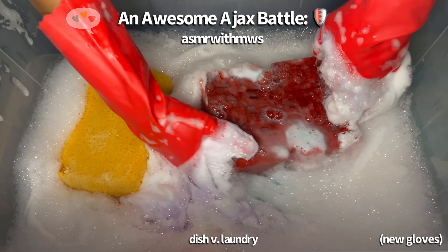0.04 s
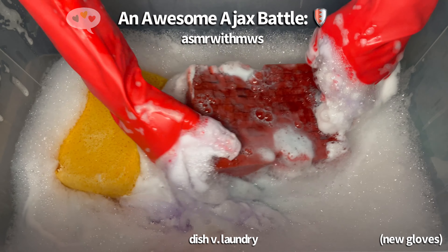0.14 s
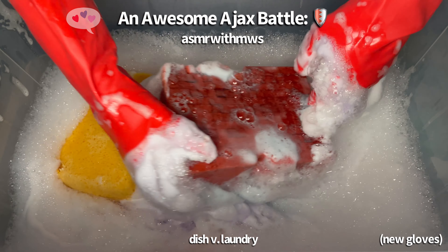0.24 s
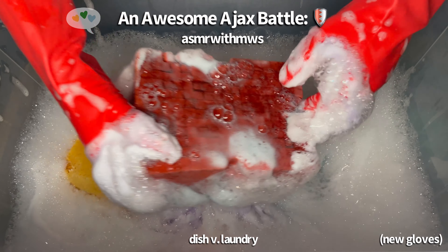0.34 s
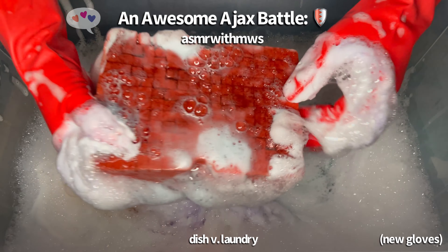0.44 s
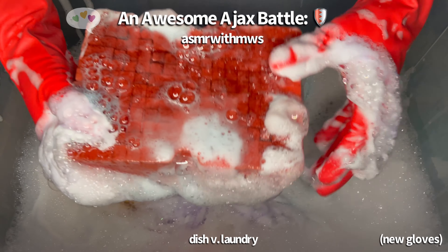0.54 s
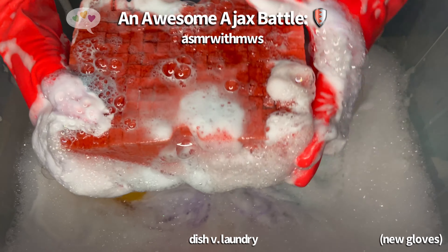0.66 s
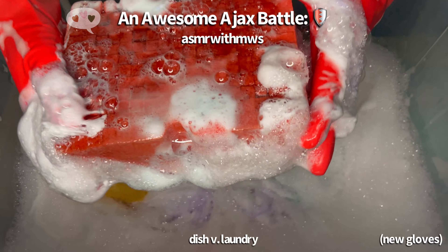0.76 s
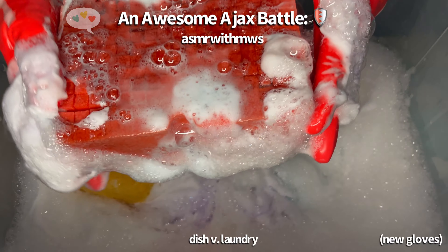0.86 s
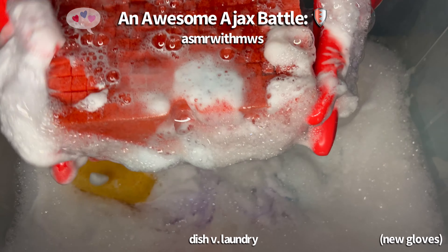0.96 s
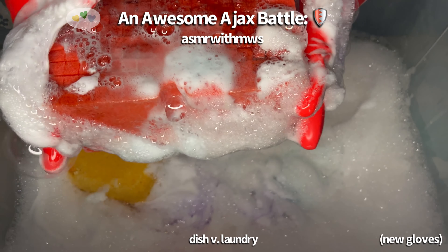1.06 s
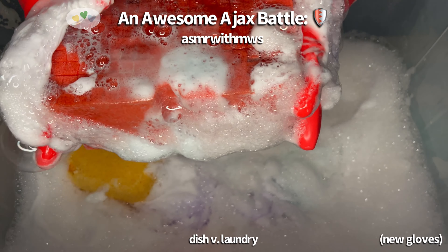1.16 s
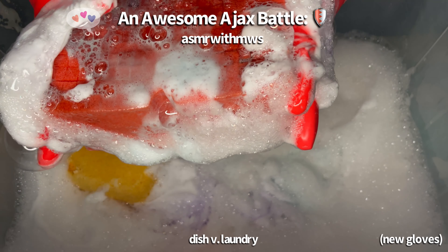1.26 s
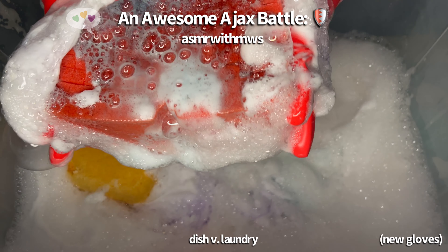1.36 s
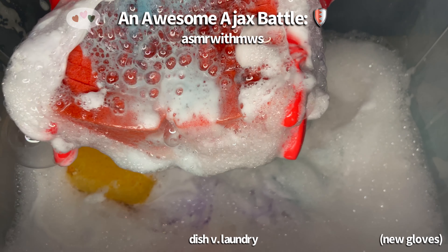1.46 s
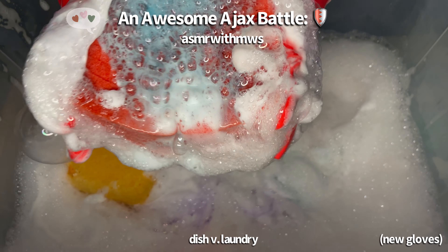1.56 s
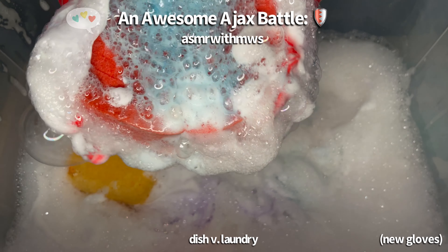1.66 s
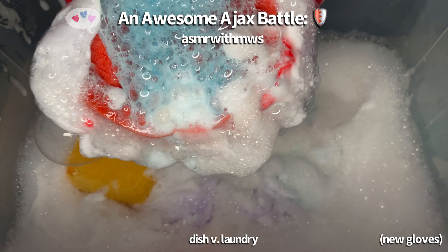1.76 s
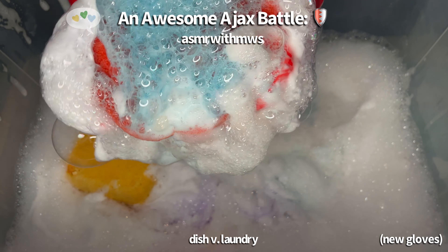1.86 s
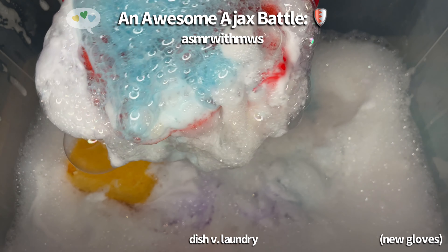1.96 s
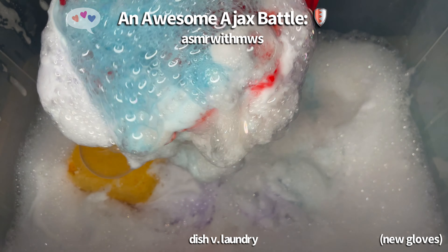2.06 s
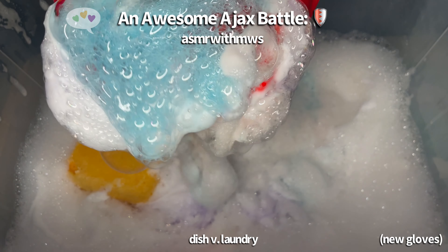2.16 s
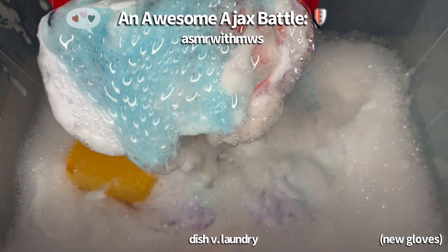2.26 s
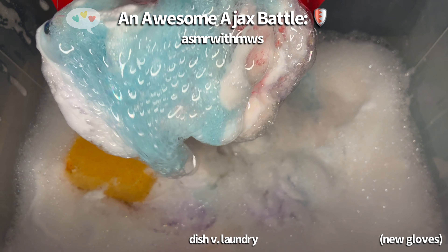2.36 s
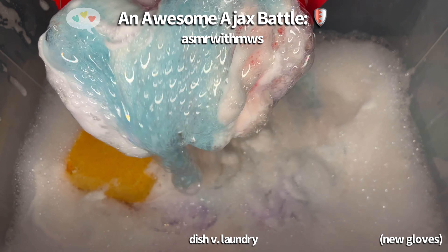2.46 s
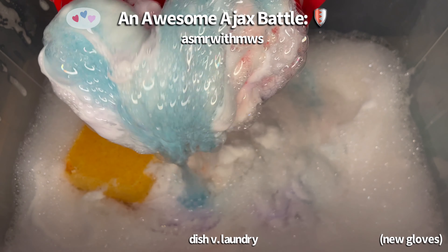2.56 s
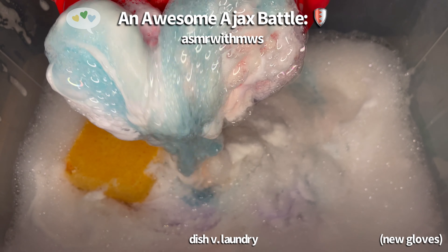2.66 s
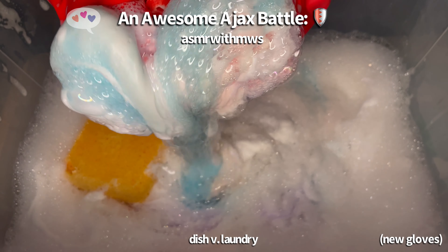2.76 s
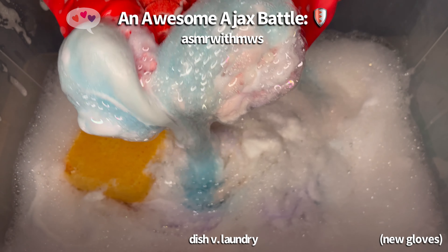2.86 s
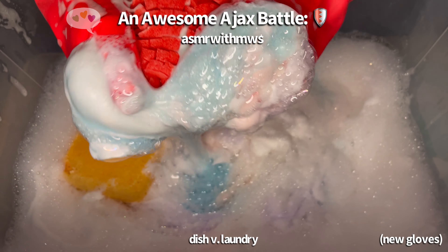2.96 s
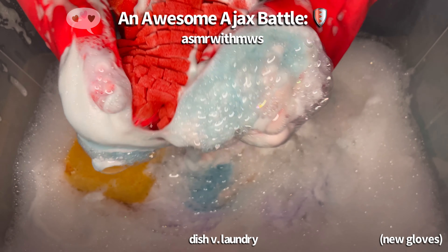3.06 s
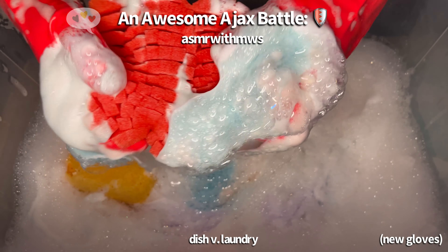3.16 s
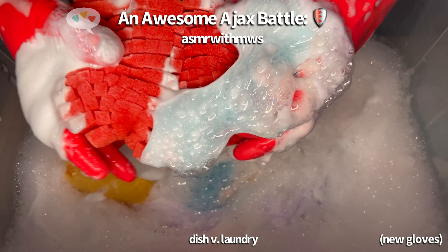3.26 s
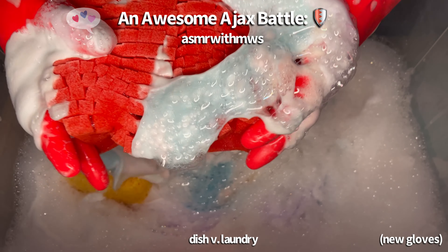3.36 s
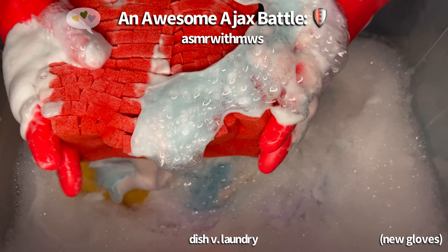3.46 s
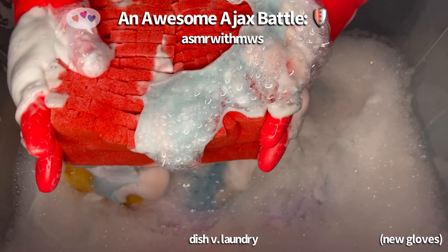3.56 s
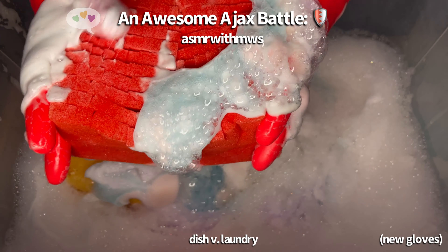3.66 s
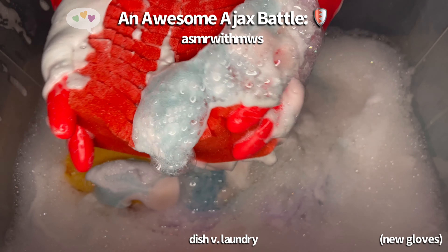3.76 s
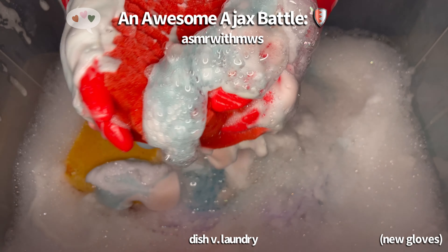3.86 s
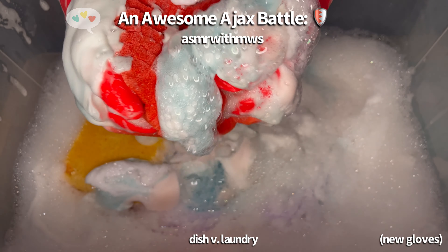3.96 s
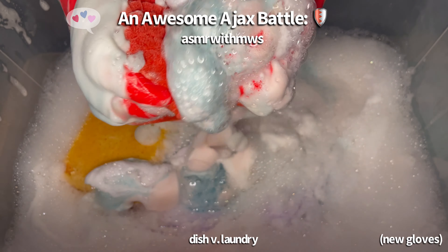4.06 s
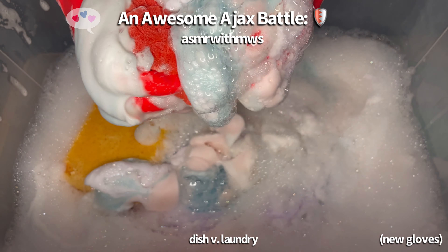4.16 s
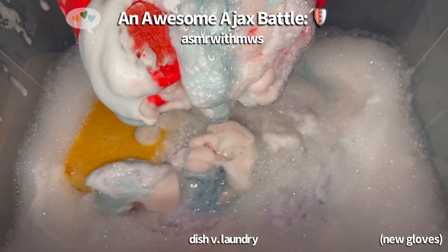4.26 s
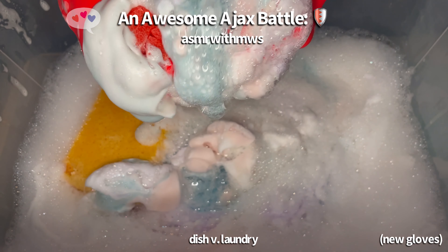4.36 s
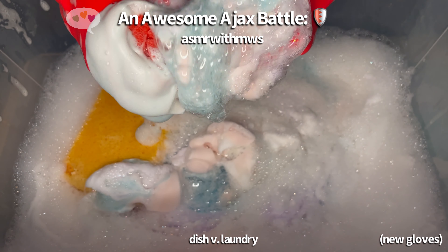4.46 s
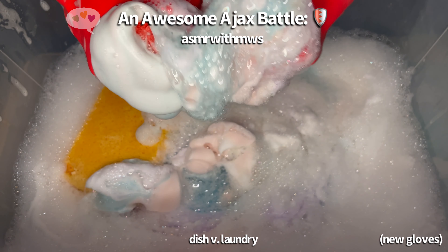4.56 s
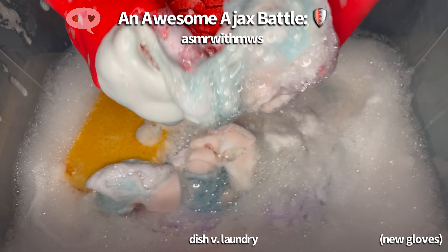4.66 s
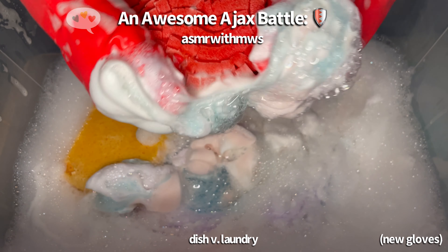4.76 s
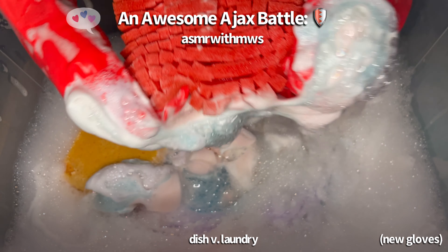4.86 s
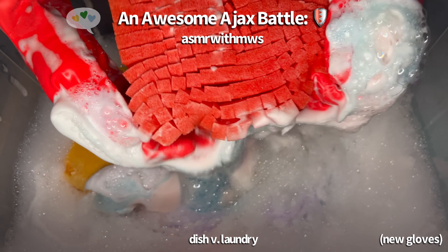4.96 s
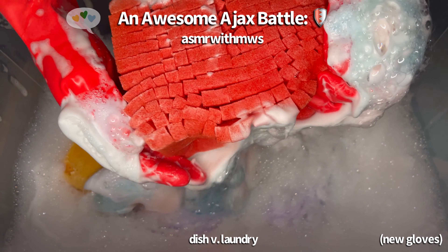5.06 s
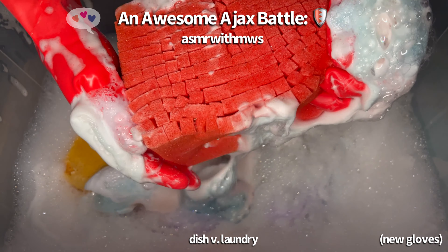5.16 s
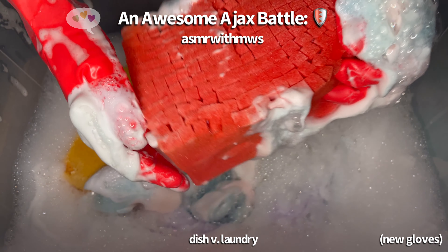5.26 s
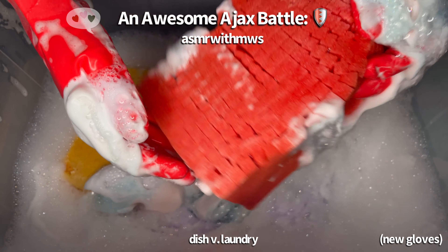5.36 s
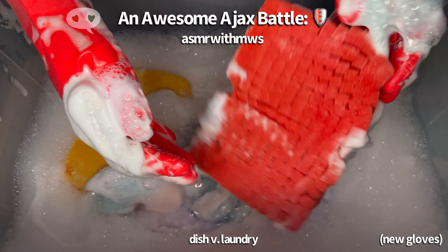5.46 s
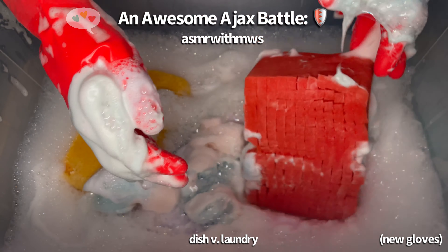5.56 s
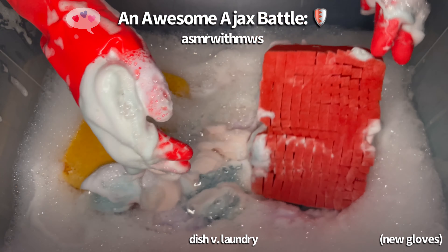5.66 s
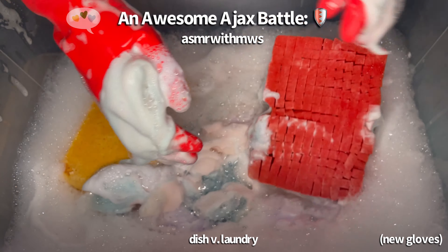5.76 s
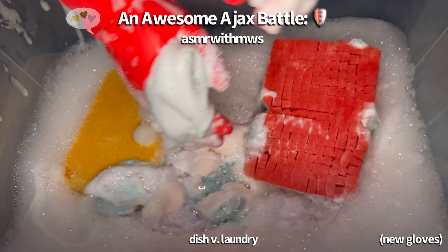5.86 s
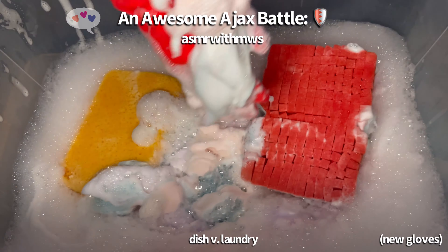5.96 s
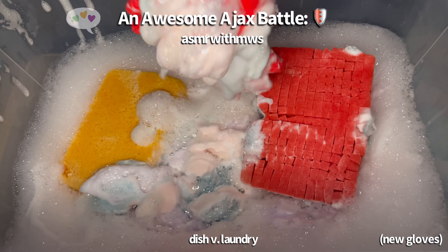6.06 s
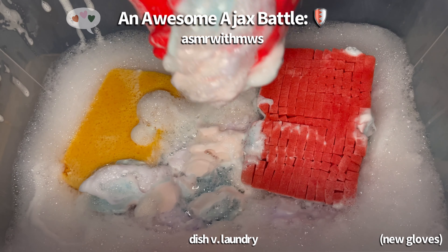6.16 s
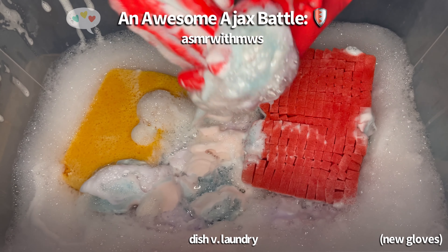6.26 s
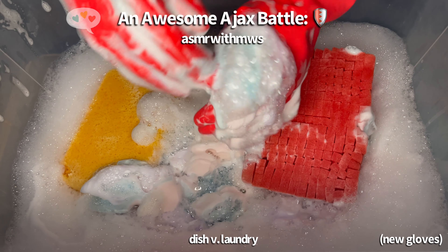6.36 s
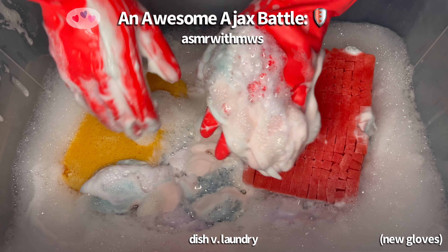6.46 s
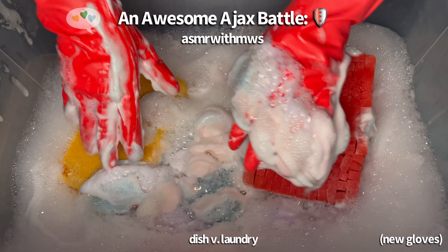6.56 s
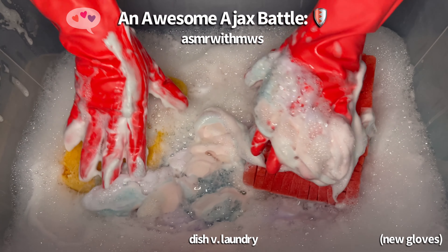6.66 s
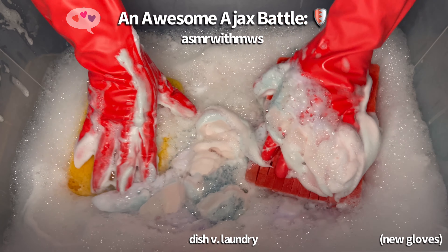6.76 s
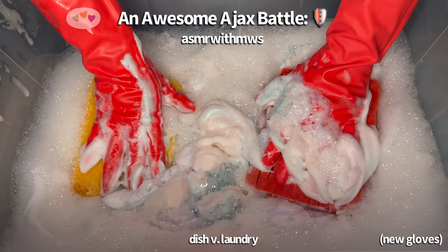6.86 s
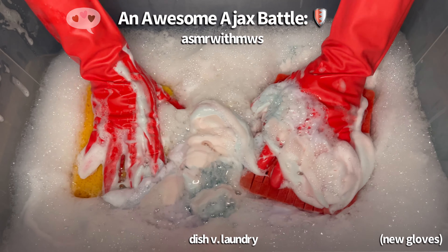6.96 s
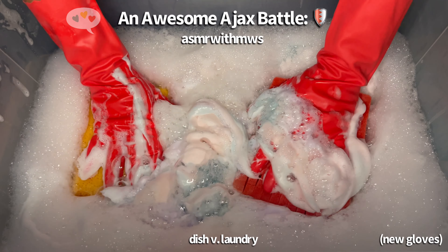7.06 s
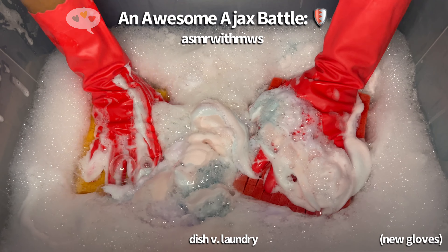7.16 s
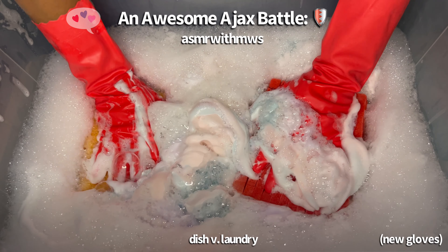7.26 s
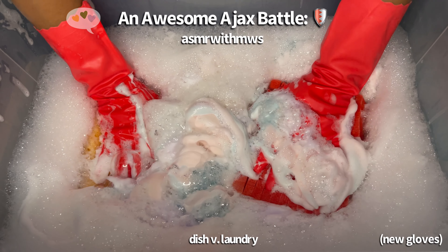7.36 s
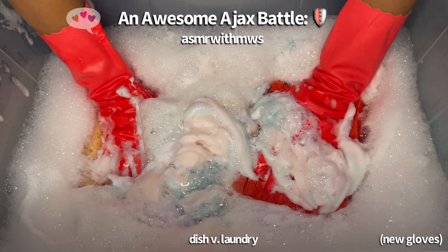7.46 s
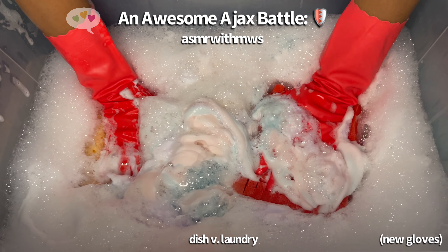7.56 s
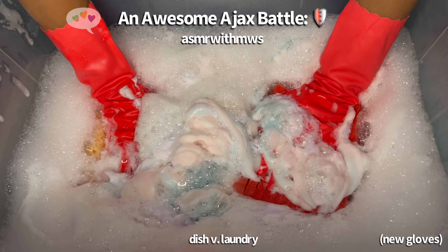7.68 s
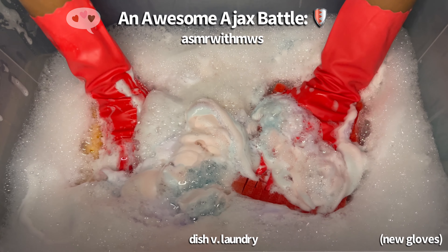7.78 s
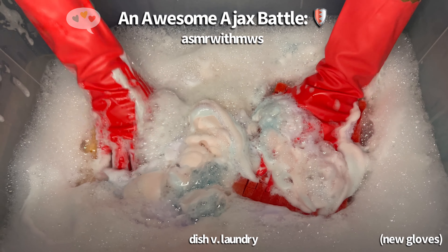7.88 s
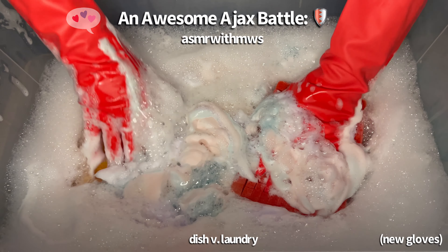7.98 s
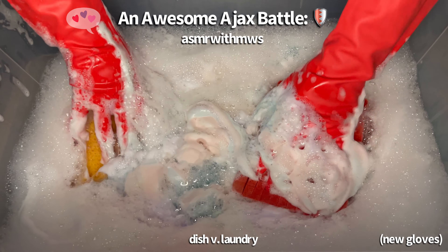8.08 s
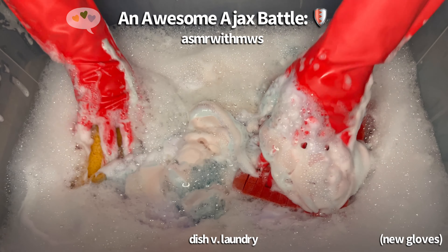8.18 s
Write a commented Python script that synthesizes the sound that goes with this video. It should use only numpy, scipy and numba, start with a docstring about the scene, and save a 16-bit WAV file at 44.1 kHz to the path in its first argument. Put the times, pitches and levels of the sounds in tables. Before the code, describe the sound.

Close stereo microphone just above a tub of suds in a quiet room. Faint grips, small pops and plops lead into a long sponge wring, fizzing and crackling before it turns into gurgling, rapid squelches. A second, stronger wring follows, dense with wet squelches. Afterwards there are small squishes, sparse bubble ticks, soft foam presses and low glove plops.

```python
"""Close two-port microphone just above a tub of suds in a quiet room with a faint hum, 8.2 s.
Small grips, air plops, film snaps and wet pops open; rubber-gloved hands wring a soapy sponge from 1.4 s and 3.8 s.
Each wring starts as a fizz of tiny ringing bubbles and bursting films; water gurgles and air burbles with it.
Wet squelches follow, slugs of air whose pitch dives as they break out.
Then come presses of sponges into the foam, a touch of the gloves at 6.7 s and low plops near the end."""
import sys
import numpy as np
from scipy import signal
from scipy.fft import rfft, irfft
from scipy.io import wavfile
from scipy.ndimage import uniform_filter1d
from numba import njit

SR = 44100
rng = np.random.default_rng(int(sys.argv[2]) if len(sys.argv) > 2 else 0)


def store_pcm(level_fs):
    """Save levels as 16-bit WAV."""
    pcm = np.round(np.clip(level_fs, -1, 1) * 32767).astype(np.int16)
    wavfile.write(sys.argv[1], SR, np.atleast_2d(pcm).T)


N = 362478


def undb(db):
    """Decibels to gain."""
    return 10 ** (np.asarray(db) / 20)


def unit(x):
    """Scale to rms 1."""
    return x / np.sqrt(np.mean(x ** 2))


def over_hz(table, column=1):
    """One column of a frequency table at every FFT bin, interpolated over log frequency."""
    rows = np.array(table)
    bins_hz = np.fft.rfftfreq(N, 1 / SR) + 1
    return np.interp(np.log(bins_hz), np.log(rows[:, 0]), rows[:, column])


def colour(x, table):
    """Filter by a spectrum table of f/Hz and level/dB; rms 1."""
    return unit(irfft(rfft(x) * undb(over_hz(table)), N))


def band(x, low_hz, high_hz):
    """Second-order band-pass."""
    return signal.sosfilt(signal.butter(2, [low_hz, high_hz], "band", fs=SR, output="sos"), x)


def even(x, span_s):
    """Take out swells slower than span_s, so that the flow alone sets the loudness."""
    power = np.abs(uniform_filter1d(x ** 2, max(int(span_s * SR), 8)))
    return x / np.sqrt(power + 1e-9)


def wander(n, span_s):
    """Smooth chance that changes about every span_s; rms 1."""
    return unit(uniform_filter1d(rng.standard_normal(n), max(int(span_s * SR), 2)))


@njit
def ring(n, times, hz, cycles, size, glide):
    """Bubbles: each swells, peaks after its cycles and dies, its pitch sliding towards glide times the start."""
    out = np.zeros(n)
    for k in range(len(times)):
        start = int(times[k] * SR)
        rise = cycles[k] * SR / hz[k]
        phase = 0.
        for i in range(max(0, -start), min(int(8 * rise), n - start)):
            age = i / rise
            slide = glide[k] + (1 - glide[k]) * np.exp(-age / 2)
            phase += 2 * np.pi * hz[k] / SR * slide
            out[start + i] += size[k] * age * np.exp(1 - age) * np.sin(phase)
    return out


def swarm(per_s, centre_hz, octaves, cycles, spread_db, glide):
    """A random stream of bubbles around a fixed or moving pitch, many small and a few large."""
    when, pitch, size, length = rng.random((int(per_s * N / SR), 4)).T
    centre_then = (centre_hz * np.ones(N))[(when * N).astype(int)]
    hz = centre_then * 2 ** (octaves * (pitch - .5))
    gain = undb(-spread_db * np.log(1 - .995 * size))
    return ring(N, when * N / SR, hz, cycles * (.5 + length), gain, np.full(len(hz), 1. * glide))


def clicks(per_s, spread_db):
    """Random impulses of either sign, many small and a few large."""
    when, size, sign = rng.random((int(per_s * N / SR), 3)).T
    gain = undb(-spread_db * np.log(1 - .997 * size))
    return np.bincount((when * N).astype(int), np.sign(sign - .5) * gain, N)


def envelope(start_s, hold_s, attack_db_per_s, release_db_per_s):
    """Attack, hold and release in dB, 0 during the hold."""
    t = np.arange(N) / SR - start_s
    return -attack_db_per_s * np.maximum(-t, 0) - release_db_per_s * np.maximum(t - hold_s, 0)


def together(levels_db):
    """Level in dB of several sounds at once: their powers add."""
    powers = [np.exp(np.maximum(db, -140) * np.log(10) / 10) for db in levels_db]
    return 10 * np.log10(sum(powers))


ROOM_DB, HUM_HZ, HUM_DB = -86.5, 120, -88.5  # levels ahead of the tub and the ports
# spectrum of the quiet room: f/Hz, relative level/dB
ROOM_COLOUR = [(25, 3), (60, 21), (120, -1.5), (300, -5), (1000, -29), (4000, -11.5), (12000, -24.5)]


def room():
    """Still air, as coloured noise, and a faint steady hum."""
    hum = np.sqrt(2) * np.sin(2 * np.pi * HUM_HZ * np.arange(N) / SR)
    air = colour(rng.standard_normal(N), ROOM_COLOUR)
    return undb(ROOM_DB) * air + undb(HUM_DB) * hum


GRIP_ATTACK_DB_PER_S, GRIP_RELEASE_DB_PER_S = 214, 183
# grips, presses and the swells of flow within the wrings, levels before each layer's trim:
# t/s, length/s, fizz level/dB, crackle level/dB, gurgle level/dB, trapped air level/dB
GRIPS_AND_SWELLS = [(0.0, 0.23, -62.5, -69, -66.5, -61), (0.338, 0.14, -58, -63, -64, -63),
                    (0.68, 0.1, -57.5, -69.5, -60, -59), (1.048, 0.065, -58, -91, -62.5, -59.5),
                    (1.194, 0.15, -46.5, -57.5, -63, -63), (1.533, 0.077, -40, -52.5, -49, -71),
                    (1.713, 0.096, -43, -68, -77, -56), (1.958, 0.15, -44.5, -78, -62, -48.5),
                    (2.614, 0.18, -47, -58, -56, -55), (2.897, 0.29, -48, -55.5, -48, -50.5),
                    (3.245, 0.25, -53.5, -62, -55, -56), (3.393, 0.35, -81, -64.5, -74, -50.5),
                    (3.612, 0.053, -72, -63, -65, -42.5), (3.777, 0.096, -44.5, -48.5, -60, -70),
                    (5.27, 0.09, -63, -63, -57, -55.5), (5.404, 0.14, -55.5, -56.5, -54, -49.5),
                    (5.598, 0.038, -80, -64, -82, -60), (5.666, 0.29, -78, -70.5, -76, -81),
                    (6.027, 0.047, -59, -61, -65, -83), (6.176, 0.037, -63.5, -60.5, -70, -87),
                    (6.262, 0.2, -69, -74, -75.5, -80), (6.788, 0.1, -58.5, -64, -74, -69),
                    (6.944, 0.35, -52.5, -59.5, -60.5, -55.5), (7.388, 0.17, -52, -62.5, -60, -55),
                    (7.713, 0.041, -64.5, -98, -62.5, -56), (7.8, 0.61, -54.5, -66, -56.5, -54)]


def grips(column):
    """Level in dB that grips, presses and swells within the wrings give to one layer of foam or water."""
    return together(row[column] + envelope(row[0], row[1], GRIP_ATTACK_DB_PER_S, GRIP_RELEASE_DB_PER_S)
                    for row in GRIPS_AND_SWELLS)


RESTING_CRACKLE_DB = -72.5  # suds left alone keep bursting; level before the crackle trim
# foam comes first: it surges, holds and sags as the pores empty; the crackle of its films does not hold
SURGE_DB_PER_S, FIZZ_HOLD_S, SAG_DB_PER_S, SPENT_DB_PER_S = 84, 0.17, 14, 59
CRACKLE_SAG_DB_PER_S = 8
WRING_S, LET_GO_DB_PER_S = 1.353, 114  # the hands wring this long after the surge, then let go
# the gloves land on the foam and crush it at once; levels before the layer trims
TOUCH_S, TOUCH_FIZZ_DB, TOUCH_CRACKLE_DB = 6.659, -63, -61
TOUCH_ATTACK_DB_PER_S, TOUCH_RELEASE_DB_PER_S = 2500, 51
# wringing the sponge, levels before each layer's trim: t/s of the foam surge, fizz level/dB, crackle level/dB,
# time until the films are spent/s, time until the water's swell turns to ebb/s, water level/dB
SPONGE_WRINGS = [(1.415, -40.5, -47.5, 0.65, 1.41, -39), (3.817, -36.5, -46.5, 1.31, 0.33, -37.5)]


def foam_levels():
    """Fizz and crackle in dB: each wring drives out a surge that sags; the films are spent before the fizz ends."""
    fizz, crackle = [grips(column=2)], [grips(column=3), RESTING_CRACKLE_DB]
    for s, fizz_db, crackle_db, spent_s, _, _ in SPONGE_WRINGS:
        surge = envelope(s, WRING_S, SURGE_DB_PER_S, LET_GO_DB_PER_S)
        fizz.append(fizz_db + surge + envelope(s, FIZZ_HOLD_S, 0, SAG_DB_PER_S))
        sag = envelope(s, 0, 0, CRACKLE_SAG_DB_PER_S)
        crackle.append(crackle_db + surge + sag + envelope(s, spent_s, 0, SPENT_DB_PER_S))
    crush = envelope(TOUCH_S, 0, TOUCH_ATTACK_DB_PER_S, TOUCH_RELEASE_DB_PER_S)
    return together(fizz + [TOUCH_FIZZ_DB + crush]), together(crackle + [TOUCH_CRACKLE_DB + crush])


# slopes of the water and of the trapped air that moves with it
SWELL_DB_PER_S, EBB_DB_PER_S = 13.5, 12
AIR_DB, AIR_SWELL_DB_PER_S, AIR_EBB_DB_PER_S = 1, 19.5, 15  # AIR_DB is relative to the water
WETTING_DB_PER_S = 16.5  # before the surge the water builds this much faster


def water_levels():
    """Gurgle and air in dB: they swell through the first wring until let go; in the second they peak early and ebb."""
    gurgle, air = [grips(column=4)], [grips(column=5)]
    for s, _, _, _, turn_s, db in SPONGE_WRINGS:
        held = db + envelope(s, WRING_S, WETTING_DB_PER_S, LET_GO_DB_PER_S)
        gurgle.append(held + envelope(s + turn_s, 0, SWELL_DB_PER_S, EBB_DB_PER_S))
        air.append(held + AIR_DB + envelope(s + turn_s, 0, AIR_SWELL_DB_PER_S, AIR_EBB_DB_PER_S))
    return together(gurgle), together(air)


# the cavities change size with the grip: t/s, air under the palms f/Hz, gurgle in the pores f/Hz
CAVITY_PITCHES = [(0.0, 194, 746), (1.1, 165, 730), (1.55, 177, 680), (1.85, 165, 645), (2.15, 205, 680),
                  (2.7, 174, 686), (3.15, 221, 610), (3.42, 134, 645), (3.65, 169, 626), (4.0, 211, 645),
                  (4.6, 183, 660), (5.0, 165, 644), (5.5, 163, 630), (6.95, 205.2, 713), (7.3, 194, 790),
                  (7.55, 230, 736), (7.72, 175, 690), (8.2, 188, 680)]


def cavity_hz(column):
    """Pitch of the air under the palms or of the pores, at every sample."""
    rows = np.array(CAVITY_PITCHES)
    return np.interp(np.arange(N) / SR, rows[:, 0], rows[:, column])


@njit
def resonate(x, hz, q):
    """A resonance whose centre moves; gain 1 at the centre."""
    y, band_state, low_state = np.empty(len(x)), 0., 0.
    for i in range(len(x)):
        g = np.tan(np.pi * hz[i] / SR)
        v = (band_state + g * (x[i] - low_state)) / (1 + g * (g + 1 / q))
        band_state = 2 * v - band_state
        low_state = low_state + 2 * g * v
        y[i] = v / q
    return y


# the lower hollow follows the pores; the upper one drifts as the fingers shift
HOLLOW_DB, HOLLOW_Q = 9.5, 8
UPPER_HOLLOW_HZ, UPPER_HOLLOW_DB, UPPER_HOLLOW_Q, HOLLOW_DRIFT_OCTAVES = 2270, -4, 5.3, 0.14


def hollows(x):
    """The hollows of the sponge ring with the fizz, and change size as it is wrung."""
    drift = 2 ** (HOLLOW_DRIFT_OCTAVES * wander(N, span_s=.2))
    lower = resonate(x, cavity_hz(column=2), 1. * HOLLOW_Q)
    upper = resonate(x, UPPER_HOLLOW_HZ * drift, 1. * UPPER_HOLLOW_Q)
    return x + undb(HOLLOW_DB) * lower + undb(UPPER_HOLLOW_DB) * upper


# spectrum of the fizzing bubbles: f/Hz, relative level/dB
FIZZ_SPECTRUM = [(350, -27), (650, -11.5), (950, -11), (1400, -4), (2300, -2), (3500, 0), (4700, -5),
                 (7000, 13)]
# spectrum of the bursting films: f/Hz, relative level/dB
FILM_SPECTRUM = [(400, -8), (1000, -4), (3000, -1), (4700, -2), (6200, 0.5), (8200, -2), (10900, 0),
                 (12000, -8.5), (13500, -48.5)]


def foam(fizz_db, crackle_db):
    """Small bubbles ring as they leave the pores, and their films burst in ticks; both come in little spurts."""
    spurts = undb(1.04 * wander(N, span_s=0.036))
    bubbles = swarm(per_s=2400, centre_hz=2038, octaves=2.38, cycles=0.82, spread_db=2.0, glide=1.076)
    # some hold together long enough to ring with a pitch of their own
    ringing = swarm(per_s=420, centre_hz=2100, octaves=1.7, cycles=3.2, spread_db=2.6, glide=1.08)
    in_sponge = hollows(unit(bubbles) + undb(-6) * unit(ringing))
    fizz = even(colour(in_sponge, FIZZ_SPECTRUM), span_s=0.14) * undb(fizz_db - 5.0)
    films = even(colour(clicks(per_s=5000, spread_db=3.9), FILM_SPECTRUM), span_s=.09)
    crackle = films * undb(crackle_db + 2.5)
    # larger films go one at a time and stand out more when the flow is gentle
    lone = colour(clicks(per_s=90, spread_db=4.0), FILM_SPECTRUM) * undb(.85 * crackle_db - 17.5)
    return (fizz + crackle) * spurts + lone


def water(gurgle_db, air_db):
    """Liquid gurgles through the pores with falling pitch; larger pockets of air burble between sponge and palms."""
    pocket_hz, gurgle_hz = cavity_hz(column=1), cavity_hz(column=2)
    gurgle = swarm(per_s=750, centre_hz=gurgle_hz, octaves=0.8, cycles=1.6, spread_db=2.6, glide=.94)
    pockets = swarm(per_s=140, centre_hz=pocket_hz, octaves=0.3, cycles=1.2, spread_db=1.5, glide=0.95)
    # the mass of wet sponge heaves between the hands, more so in a hard squeeze
    heave = swarm(per_s=150, centre_hz=140, octaves=2.1, cycles=0.55, spread_db=3.0, glide=1.0)
    # now and then a bubble in the gurgling water cracks open
    cracks = swarm(per_s=130, centre_hz=1600, octaves=1.4, cycles=0.8, spread_db=2.6, glide=.9)
    # the water comes through unevenly
    lumps = undb(1.5 * wander(N, span_s=.04))
    liquid = unit(cracks) * undb(gurgle_db - 11.0) + even(gurgle, 0.11) * undb(gurgle_db - 7.0)
    burble = even(pockets, 0.017) * undb(air_db - 3.5)
    heaving = even(band(heave, 49, 420), 0.034) * undb(1.133 * air_db - 3.5)
    return lumps * (liquid + burble + heaving)


# air pockets opening under a glove, before trims of level and pitch: t/s, level/dB, f/Hz
GLOVE_PLOPS = [(0.006, -52, 184), (0.029, -50.5, 179), (0.142, -53, 180), (0.455, -45.5, 198),
               (1.089, -52.5, 166), (2.106, -41, 202), (3.69, -43.5, 246), (6.989, -46, 194),
               (7.029, -52, 186), (7.186, -50, 185), (7.246, -47, 183), (7.504, -47, 196),
               (7.553, -44.5, 185), (7.864, -29, 188), (8.003, -46, 169), (8.173, -38.5, 192)]


def plops(lead_s=0.0038, splash_db=-19, splash_s=0.033):
    """A pocket of air under the rubber rings low and briefly and spits a little foam."""
    s, db, hz = np.array(GLOVE_PLOPS, float).T
    same = np.ones(len(s))
    rings = ring(N, s - lead_s, 0.98 * hz, 1.0 * same, undb(db + 2.0), 1.0 * same)
    t = np.arange(N) / SR
    spit = sum(undb(peak_db + splash_db) * np.exp(-np.abs(t - at) / splash_s) for at, peak_db in zip(s, db))
    bursts = clicks(per_s=3000, spread_db=2.5)
    # the soft rubber rounds the onset: the rings are band-passed
    return band(rings, 134, 660) + spit * unit(band(bursts, 190, 4300))


# single soap films snapping, before level trims: t/s, level/dB, f/Hz
FILM_SNAPS = [(0.056, -46, 2820), (0.0863, -44.5, 2530), (0.2506, -44, 2130), (0.9283, -45, 7350),
              (0.946, -43, 7200), (1.272, -48, 1840), (1.422, -30, 2200), (1.7583, -35, 1840),
              (2.6233, -36, 2380), (2.712, -31, 1570), (2.4605, -36, 2930), (2.632, -35, 2900),
              (2.678, -33, 2500), (2.798, -35.5, 2600), (2.894, -40, 3140), (3.166, -38, 1570),
              (4.2318, -21, 2160), (4.2454, -31, 5740), (5.9782, -50, 2760), (6.1398, -41.5, 5640),
              (6.206, -44, 3300)]


def snaps(tick_s=0.0012):
    """A large film snaps: a sharp tick of noise and a very short ring of its bubble, falling in pitch."""
    s, db, hz = np.array(FILM_SNAPS, float).T
    blows = np.bincount((s * SR).astype(int), undb(db), N)
    t = np.arange(256) / SR
    noise = band(rng.standard_normal(len(t)), 1200, 10500)
    tick = band(noise * np.exp(-t / tick_s), 840, 10500)
    same = np.ones(len(s))
    rings = ring(N, s, hz, 1.2 * same, undb(db - 1), .9 * same)
    return undb(-4.5) * np.convolve(blows, tick)[:N] + rings


# single wet bubbles popping, before the level trim: t/s, level/dB, f/Hz
WET_POPS = [(0.135, -49, 424), (0.183, -53, 463), (0.185, -45, 1600), (0.286, -51, 726), (0.305, -44, 1550),
            (0.332, -47.5, 730), (0.371, -49, 680), (0.358, -47, 1150), (0.381, -49, 850),
            (0.433, -45, 840), (1.857, -41, 635), (1.903, -33.5, 1550), (1.924, -29, 2100),
            (1.948, -30.5, 590), (1.969, -34, 1140), (1.981, -30.5, 1250), (2.022, -42, 610),
            (2.179, -35, 576), (2.229, -38, 760), (2.38, -34, 990), (2.437, -35, 1197), (2.664, -31, 1410),
            (2.773, -31, 935), (2.045, -29, 820), (2.117, -33, 1150), (2.206, -42, 740), (2.241, -33, 1260),
            (2.279, -30, 880), (2.447, -32, 1190), (2.5443, -29, 1350), (2.549, -22, 830),
            (2.584, -34, 1800), (2.887, -46, 751), (2.902, -34, 820), (3.952, -37, 1500),
            (4.07, -41.5, 1300), (4.11, -26, 1140), (4.1738, -25.5, 1010), (4.213, -31, 830),
            (4.276, -28.5, 1900), (4.308, -25.5, 2310), (4.456, -33, 1913), (4.574, -40.5, 1440),
            (4.786, -35, 550), (4.887, -50, 564), (4.912, -38, 720), (4.946, -37, 536), (5.041, -39, 654),
            (5.198, -40.5, 523), (5.336, -47, 900), (5.527, -42, 565), (5.545, -45, 600)]


def pops(cycles=0.97, glide=1.0, lead_s=0.00047):
    """A wet bubble opens and rings briefly at a steady pitch, peaking after about one cycle."""
    s, db, hz = np.array(WET_POPS, float).T
    same = np.ones(len(s))
    return ring(N, s - lead_s, hz, cycles * same, undb(db - 6.0), glide * same)


def squelch(crest_db, crest_hz, belly_db, fall_s, belly_hz=122, crest_width_s=0.0014,
            belly_width_s=0.0048, spray_s=0.006):
    """A slug of air breaks out: its cavity opens in jerks, so the pitch dives from a ragged crest to a low belly."""
    t = np.arange(-int(.03 * SR), int(.04 * SR)) / SR  # 0 at the crest
    jerks = np.exp(.3 * wander(len(t), span_s=.001))
    opening = 1 / (1 + (np.maximum(t, 0) / (0.00083 + 0.212 * fall_s)) ** 2)
    hz = (belly_hz + (crest_hz - belly_hz) * opening) * jerks
    crest = undb(crest_db - 9.0) * np.exp(-.5 * (t / crest_width_s) ** 2)
    belly = undb(belly_db + 2.0) * np.exp(-.5 * ((t - fall_s) / belly_width_s) ** 2)
    tone = (crest + belly) * np.sin(2 * np.pi * (np.cumsum(hz) / SR + rng.random()))
    # just before the crest the film around the slug tears into a spray of small bursts
    tears = rng.standard_normal(len(t)) * (rng.random(len(t)) < .03)
    since = t + 0.0026
    burst = np.exp(-np.abs(since) / spray_s) * (since > 0)
    spray = unit(band(tears * burst, 0.91 * crest_hz, 4.5 * crest_hz)) * np.sqrt(np.mean(burst ** 2))
    return t, tone + spray * undb(crest_db - 24.5)


def shreds(count=6, before_s=0.0055, after_s=0.007, db=-14.5, pitch_ratio=1.75):
    """Each slug tears into a knot of wet bubbles: small high ones first, larger and lower ones behind."""
    s, crest_db, crest_hz = np.repeat(np.array(AIR_SLUGS)[:, :3], count, axis=0).T
    turn, pitch, size, length = rng.random((len(s), 4)).T
    centre_hz = pitch_ratio * crest_hz
    hz = centre_hz * 2 ** (1.5 * (pitch - .5) - 1.1 * (turn - .5))
    level_db = crest_db + db + 10 * (size - .5) - 14 * np.abs(turn - .5) - 4 * np.log2(hz / centre_hz)
    when = s + CREST_DELAY_S - before_s + (before_s + after_s) * turn
    return ring(N, when, hz, .6 + length, undb(level_db), .8 + .3 * pitch)


CREST_DELAY_S = 0.00247  # from the break of a slug to its crest
# slugs of air and suds breaking out, levels before trims:
# t/s, crest level/dB, crest f/Hz, belly level/dB, time from crest to belly/s
AIR_SLUGS = [(0.357, -45, 719, -63, 0.0092), (0.394, -48, 1370, -56.5, 0.0052),
             (0.45, -39.5, 649.6, -54, 0.009), (0.483, -45, 1125, -61, 0.0084),
             (1.947, -30, 989, -62, 0.01), (2.043, -39, 837, -68, 0.01), (2.135, -28.5, 854, -45, 0.0027),
             (2.16, -32.5, 740, -45, 0.0095), (2.243, -25.5, 877, -37, 0.013),
             (2.276, -38, 915, -48, 0.0093), (2.295, -29, 879, -42, 0.0073),
             (2.318, -27.5, 721, -37, 0.016), (2.376, -27.5, 880.5, -31.5, 0.014),
             (2.418, -30.5, 670, -45, 0.01), (2.445, -28.5, 745, -44, 0.0051),
             (2.464, -22.5, 734, -33.5, 0.0082), (2.5, -27.5, 1173, -40, 0.0041),
             (2.547, -27, 842, -34, 0.0083), (2.603, -27, 813, -42, 0.0073),
             (2.643, -22, 760, -29.5, 0.0096), (2.676, -23, 747, -43, 0.0071), (2.71, -21, 756, -33, 0.007),
             (2.756, -19, 870, -30, 0.011), (2.798, -38, 627, -39, 0.0075),
             (2.842, -32.5, 637, -46.5, 0.011), (3.998, -23.5, 545, -35.5, 0.013),
             (4.045, -23, 669.5, -33.5, 0.011), (4.092, -30, 606.4, -35, 0.0047),
             (4.1092, -19, 856, -32.5, 0.0097), (4.161, -25, 599, -33, 0.0041),
             (4.1724, -28, 807, -23.5, 0.0034), (4.22, -19.5, 792, -35.5, 0.0065),
             (4.231, -16, 741, -35.5, 0.0065), (4.268, -17, 796, -28, 0.0085),
             (4.281, -19.5, 760, -27.5, 0.0066), (4.305, -36.5, 881, -32, 0.0044),
             (4.345, -26.5, 603, -35, 0.0099), (4.357, -20, 772, -34, 0.0056),
             (4.385, -29, 885, -38.5, 0.0048), (4.402, -38, 806, -38.5, 0.005),
             (4.455, -27, 693, -40, 0.0053), (4.4674, -19.5, 977, -30.5, 0.0092),
             (4.521, -20.5, 739, -28.5, 0.0077), (4.536, -22.5, 902, -34, 0.0076),
             (4.572, -24, 761, -46, 0.008), (4.617, -25, 733, -41.5, 0.01),
             (4.663, -35.5, 609, -46, 0.0074), (4.703, -39, 415, -39.5, 0.0072),
             (4.742, -47, 377, -43, 0.0081), (4.943, -26.5, 626, -54, 0.0073),
             (5.378, -51, 753, -51, 0.0065), (5.396, -38, 787, -47, 0.012), (5.41, -36, 704, -57, 0.0036),
             (5.423, -38.5, 798, -55, 0.011), (5.49, -42, 631, -51.5, 0.0075),
             (5.595, -67, 478, -47, 0.0086)]


def squelches():
    """Every slug, wrapped in its knot of wet bubbles."""
    out = np.zeros(N + SR)
    for s, *shape in AIR_SLUGS:
        t, sound = squelch(*shape)
        start = int((s + CREST_DELAY_S + t[0]) * SR)
        out[start:start + len(t)] += sound
    return out[:N] + shreds()


# each slug lets the pressure out, so the flow falters just after it
LULL_DB, LULL_AFTER_S, LULL_WIDTH_S, FOAM_LULL_SHARE = -5.5, 0.027, 0.013, 0.6


def lulls():
    """Dip of the flow in dB in the moments after the slugs."""
    t, dip = np.arange(N) / SR, np.zeros(N)
    for s, *_ in AIR_SLUGS:
        near = slice(int(s * SR), int((s + .1) * SR))
        falter = np.exp(-.5 * ((t[near] - s - LULL_AFTER_S) / LULL_WIDTH_S) ** 2)
        dip[near] = np.maximum(dip[near], falter)
    return LULL_DB * dip


# balance of the flow between the big air pockets and the pores: f/Hz, gain level/dB
FLOW_BALANCE = [(280, -1.5), (335, 3.5), (420, 1), (500, -0.5)]


def suds(foam_db, water_db):
    """One stream of wet sponge sound: foam and water falter after each slug, and the slugs break through."""
    lull_db = lulls()
    flow = foam(*foam_db) * undb(FOAM_LULL_SHARE * lull_db) + water(*water_db) * undb(lull_db)
    return irfft(rfft(flow) * undb(over_hz(FLOW_BALANCE)), N) + squelches()


# air resonances between the hands and the tub: f/Hz, width/Hz, level/dB added to the direct sound
TUB_RESONANCES = [(120.5, 8.3, 4), (270, 37, 5.5), (377.6, 30, 2.5), (543, 52, -11), (703, 46, -8),
                  (882, 120, -6.5), (1068, 69, -12), (2470, 290, -16.5)]


def tub(x):
    """The hollow of the tub adds its short resonances to the direct sound."""
    resonances = [undb(db) * signal.lfilter(*signal.iirpeak(hz, hz / width, fs=SR), x)
                  for hz, width, db in TUB_RESONANCES]
    return x + sum(resonances)


# the two microphone ports: f/Hz, phase by which the left leads/rad, level/dB of the sound from the sides
MICROPHONE_PORTS = [(150, 0.0, -26), (350, -0.0, -17), (800, -0.6, -11), (1600, 0.0, -20), (2900, 1.1, -9),
                    (4200, 0.7, -6), (4700, 2.6, -5), (5200, 4.9, -10), (5900, 6.3, -22), (7500, 8.1, -10),
                    (9300, 9.4, -32), (11800, 12.3, -14)]
# how much stronger the left port hears than the right: f/Hz, level/dB
LEFT_OVER_RIGHT = [(150, 0.5), (300, 0), (520, 3), (750, 3.5), (1100, -2.2), (2000, .3), (4000, -0.1),
                   (8000, -1)]


def ports(centre, around):
    """Sound from the middle reaches the two ports out of step; suds off to the sides differ between them."""
    mid = rfft(tub(centre))
    side = rfft(tub(around)) * undb(over_hz(MICROPHONE_PORTS, column=2))
    # each port takes half of the phase lead and half of the balance
    turn = np.exp(.5j * over_hz(MICROPHONE_PORTS, column=1)) * undb(over_hz(LEFT_OVER_RIGHT) / 2)
    return np.array([irfft((mid + side) * turn, N), irfft((mid - side) / turn, N)])


def scene():
    """Everything in the tub, heard close from just above it."""
    levels = foam_levels(), water_levels()
    centre = room() + suds(*levels) + plops() + snaps() + pops()
    return ports(centre=centre, around=suds(*levels))


TOP_HZ = 13800


def record(dry):
    """The recorder thins the deepest bass and cuts the top steeply."""
    thinned = signal.sosfilt(signal.butter(3, 45, "high", fs=SR, output="sos"), dry)
    return signal.sosfilt(signal.ellip(8, .2, 70, TOP_HZ, fs=SR, output="sos"), thinned)


dry = scene()
out = record(dry)
store_pcm(out)
```